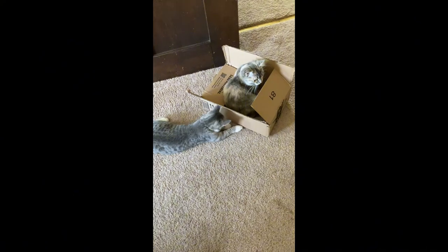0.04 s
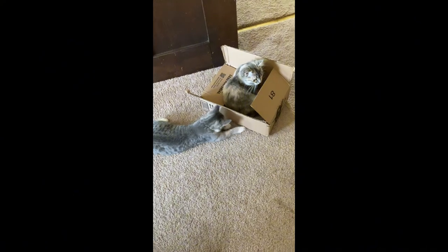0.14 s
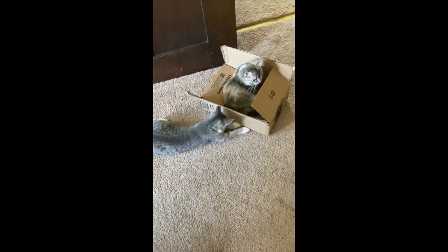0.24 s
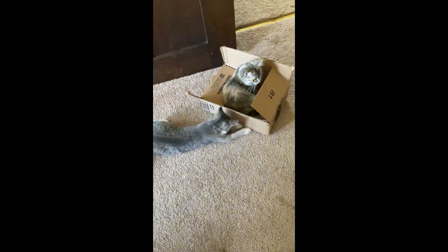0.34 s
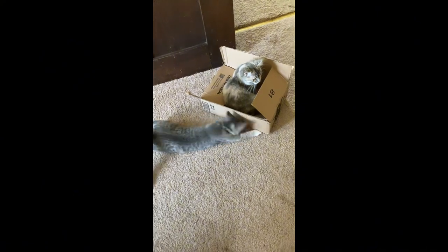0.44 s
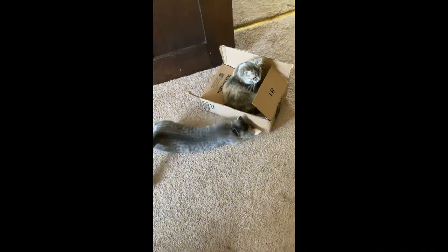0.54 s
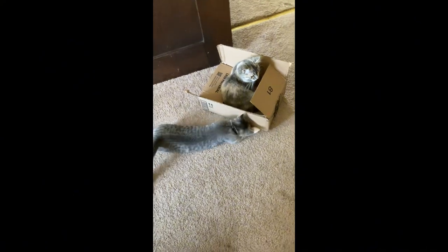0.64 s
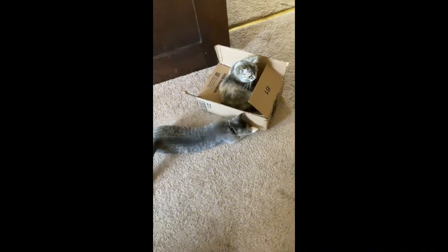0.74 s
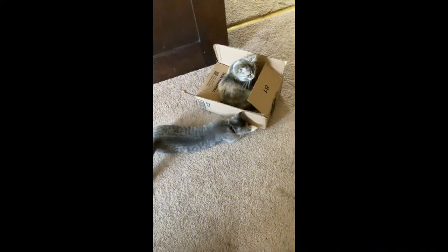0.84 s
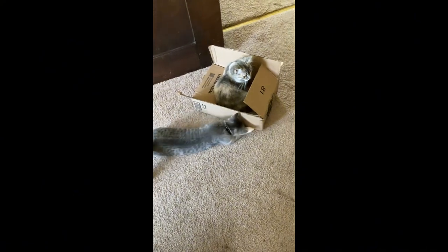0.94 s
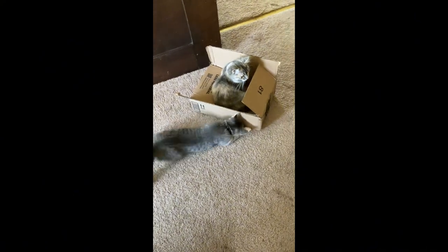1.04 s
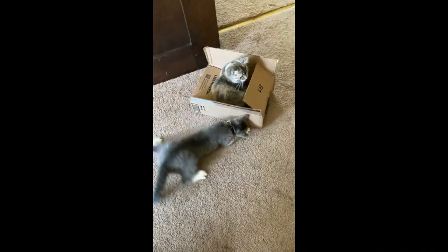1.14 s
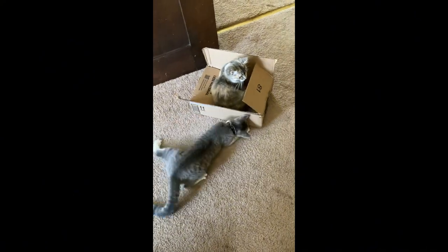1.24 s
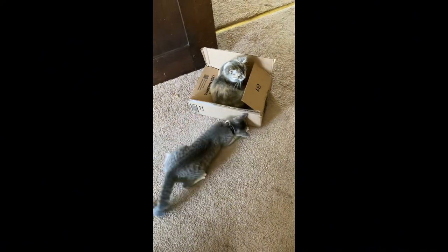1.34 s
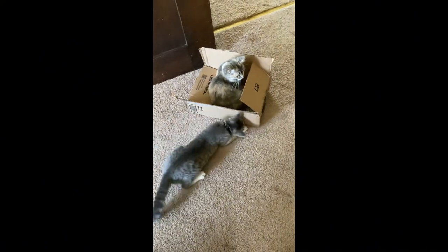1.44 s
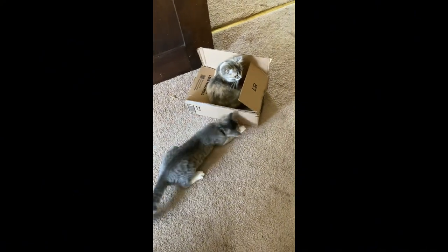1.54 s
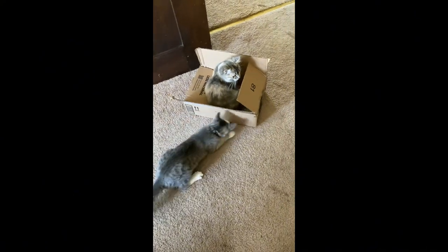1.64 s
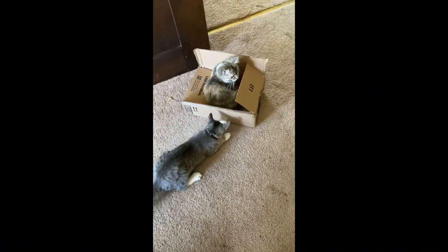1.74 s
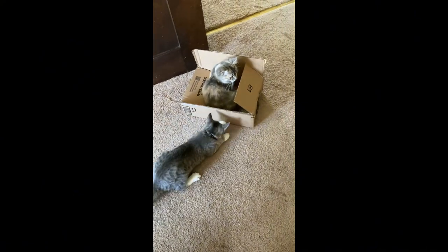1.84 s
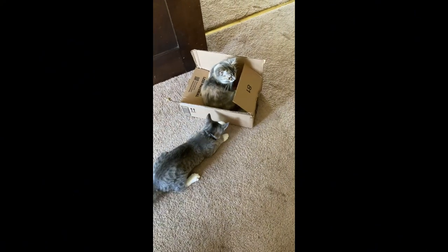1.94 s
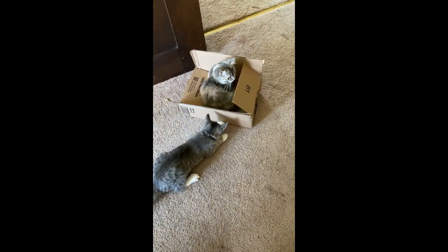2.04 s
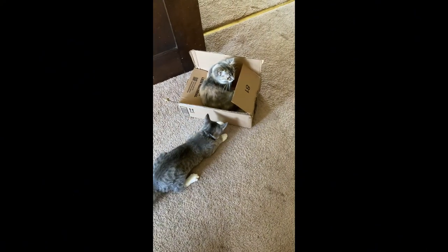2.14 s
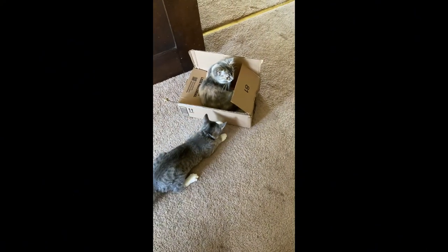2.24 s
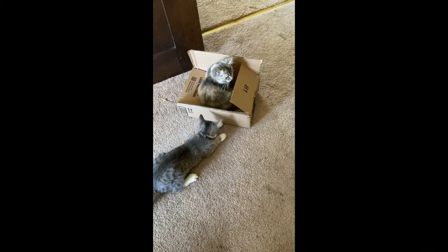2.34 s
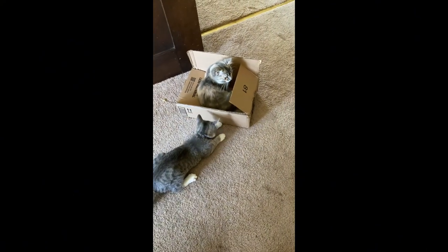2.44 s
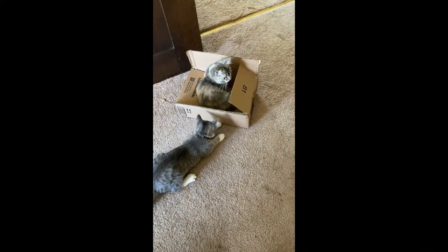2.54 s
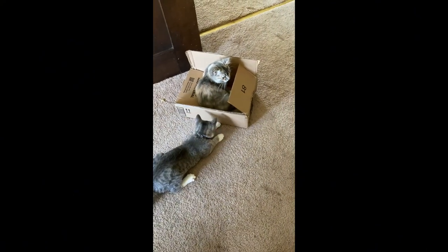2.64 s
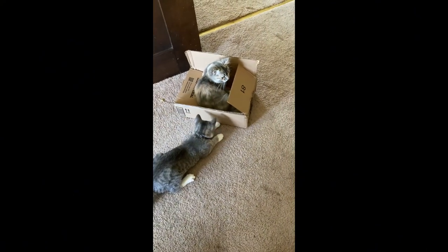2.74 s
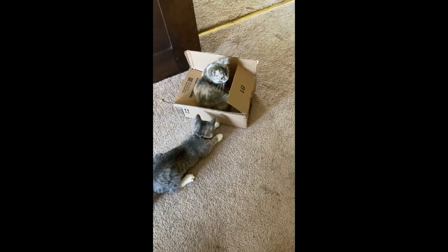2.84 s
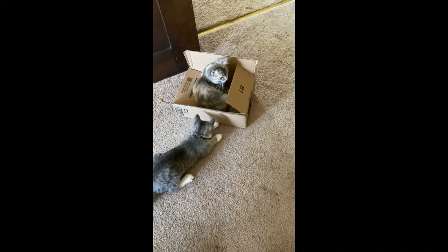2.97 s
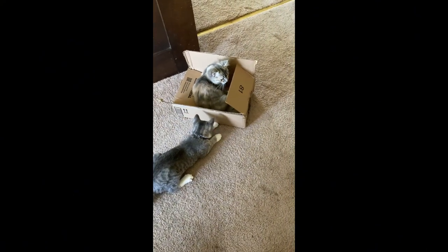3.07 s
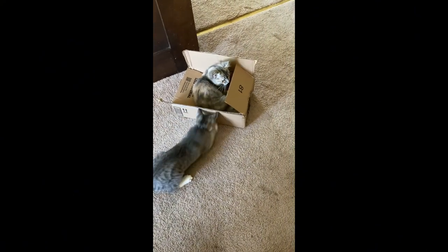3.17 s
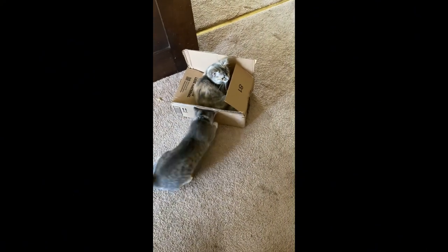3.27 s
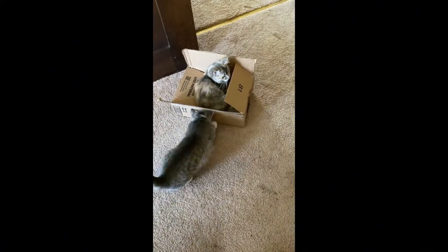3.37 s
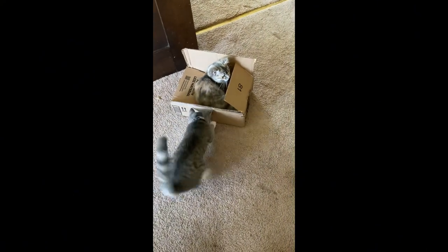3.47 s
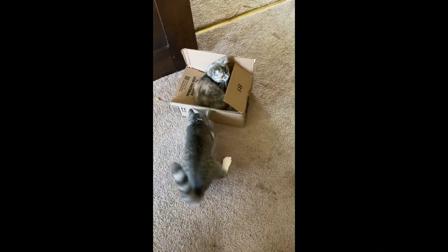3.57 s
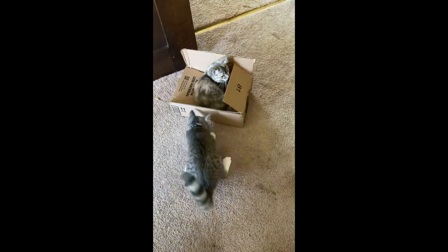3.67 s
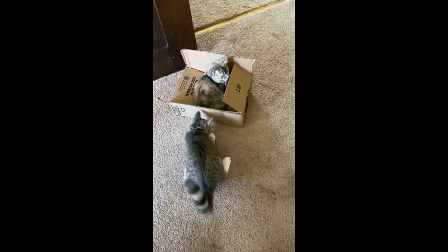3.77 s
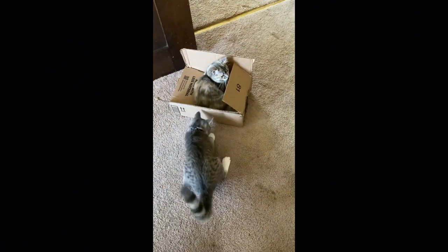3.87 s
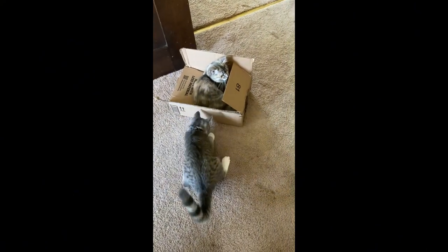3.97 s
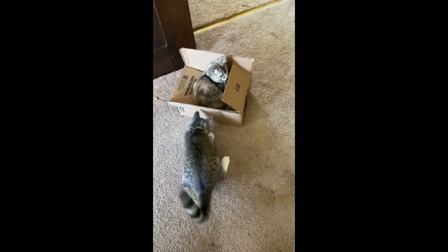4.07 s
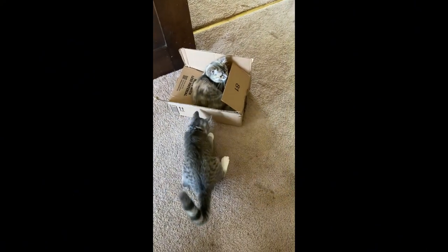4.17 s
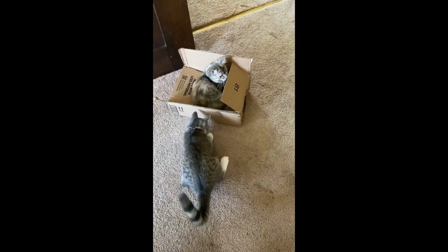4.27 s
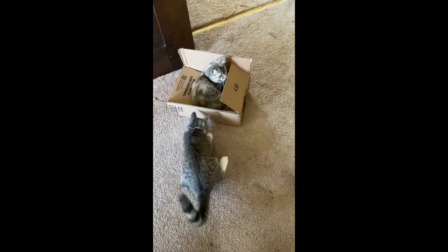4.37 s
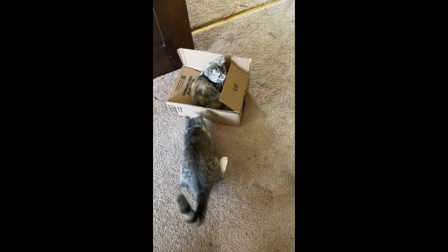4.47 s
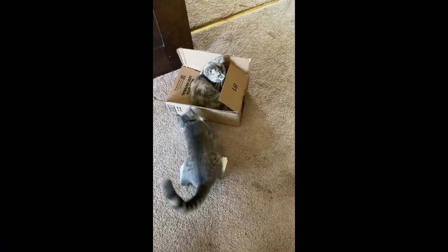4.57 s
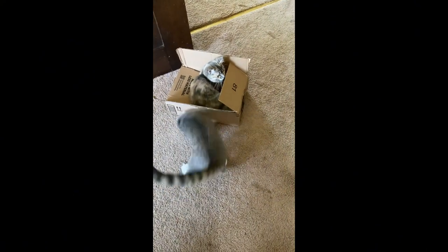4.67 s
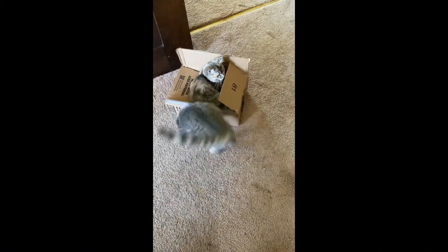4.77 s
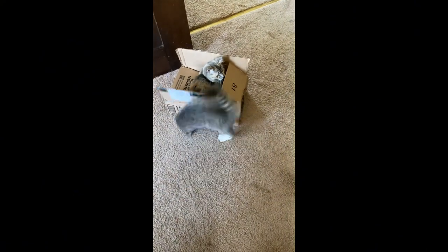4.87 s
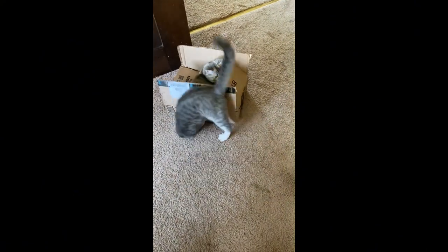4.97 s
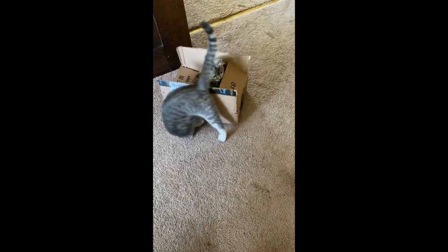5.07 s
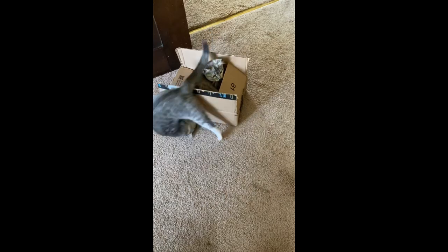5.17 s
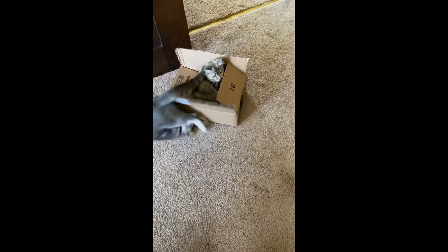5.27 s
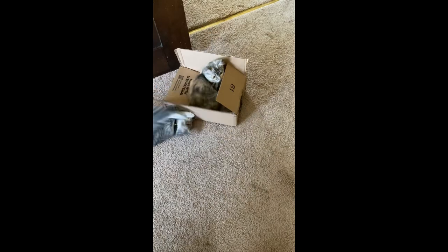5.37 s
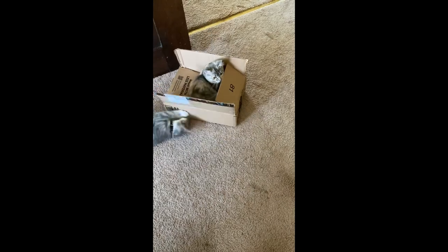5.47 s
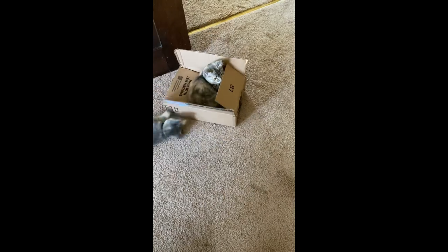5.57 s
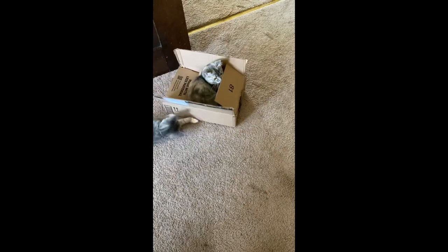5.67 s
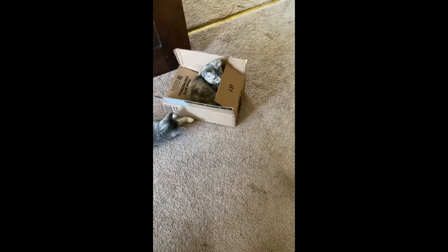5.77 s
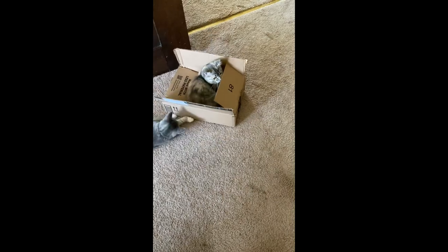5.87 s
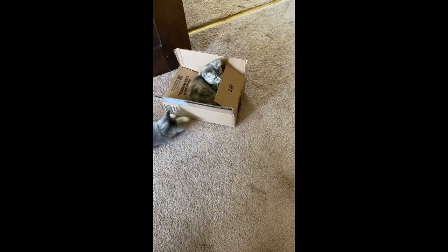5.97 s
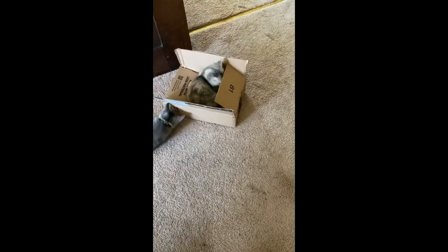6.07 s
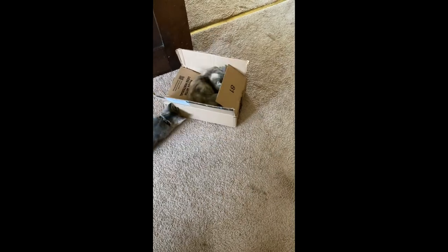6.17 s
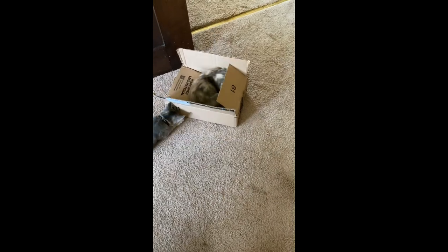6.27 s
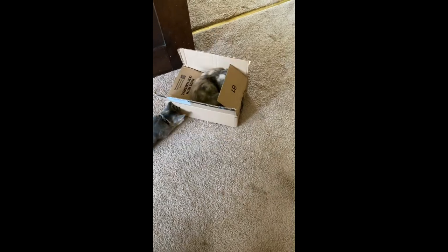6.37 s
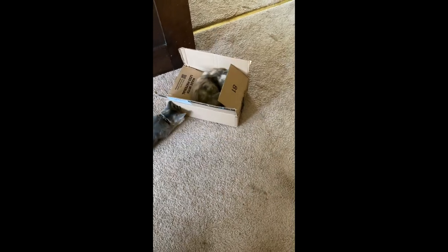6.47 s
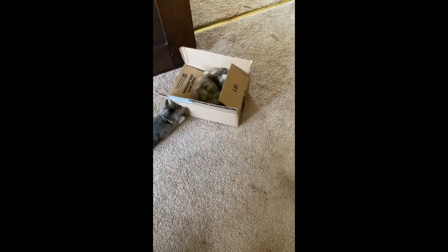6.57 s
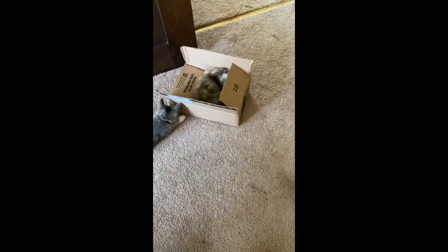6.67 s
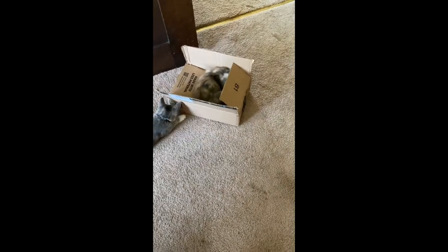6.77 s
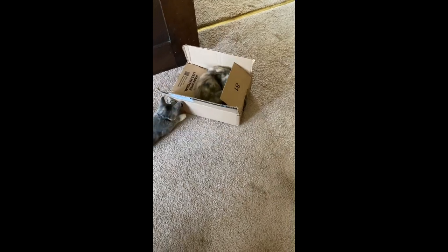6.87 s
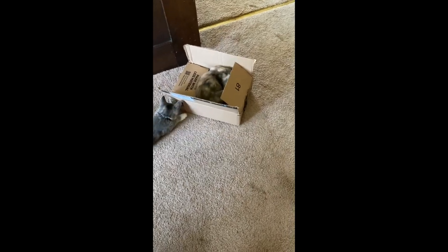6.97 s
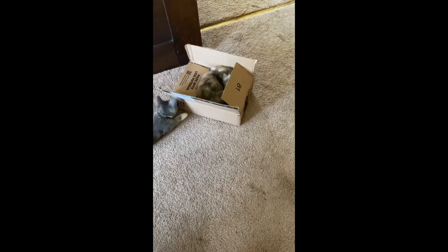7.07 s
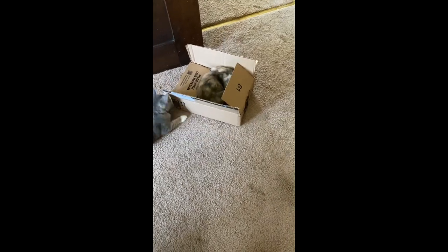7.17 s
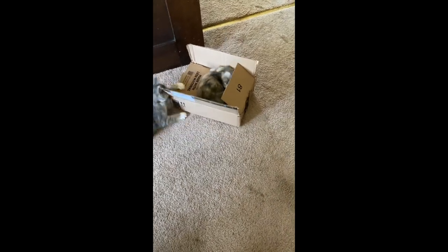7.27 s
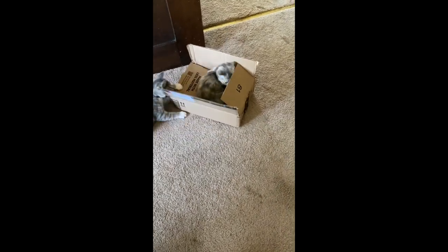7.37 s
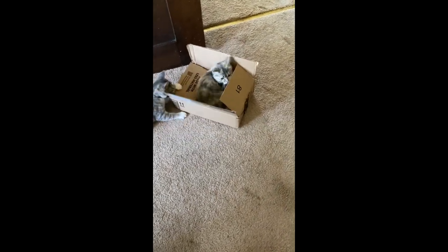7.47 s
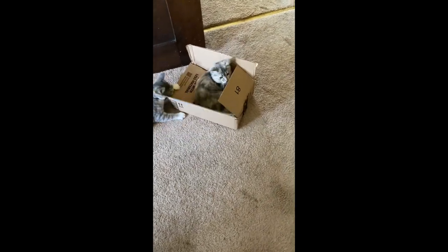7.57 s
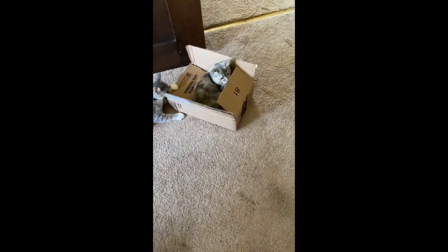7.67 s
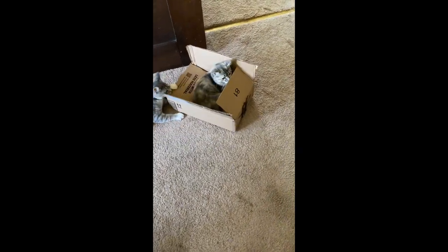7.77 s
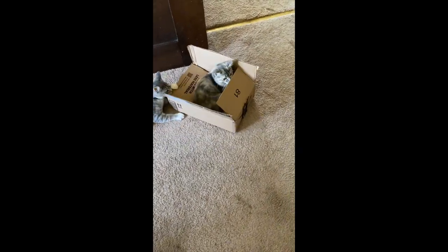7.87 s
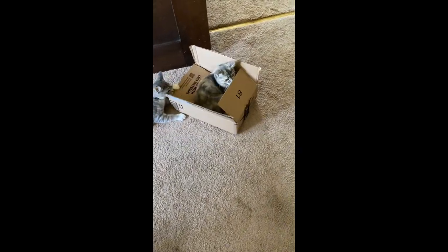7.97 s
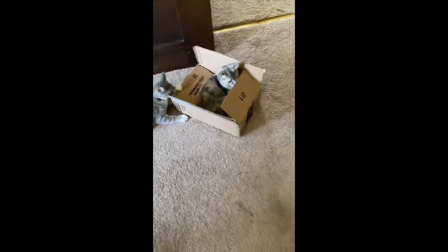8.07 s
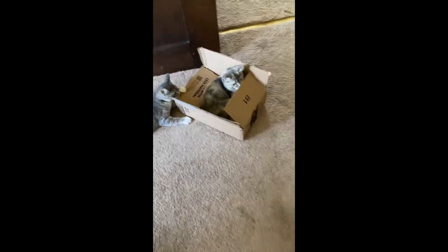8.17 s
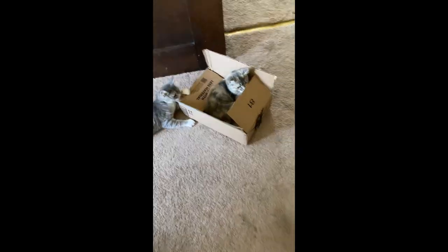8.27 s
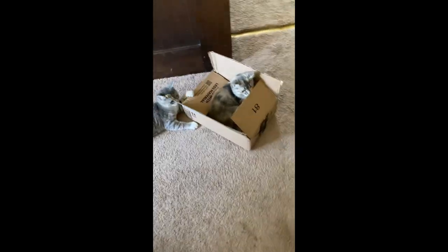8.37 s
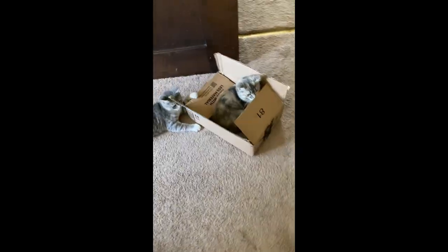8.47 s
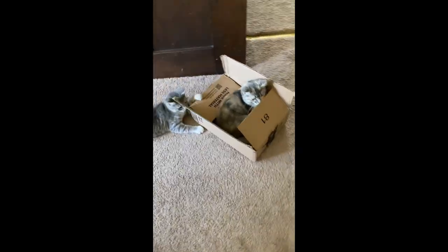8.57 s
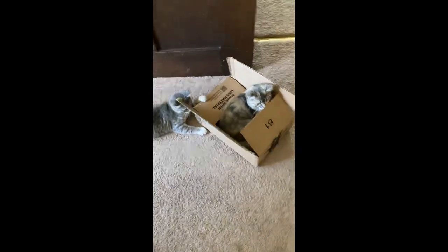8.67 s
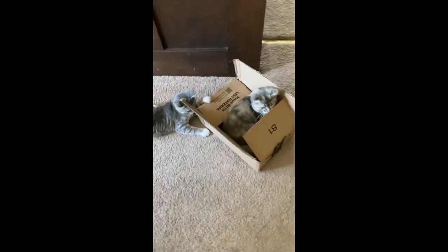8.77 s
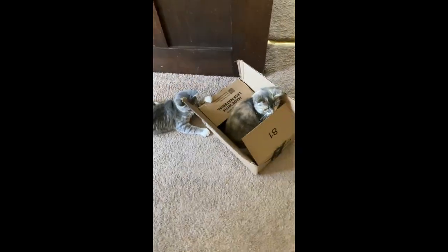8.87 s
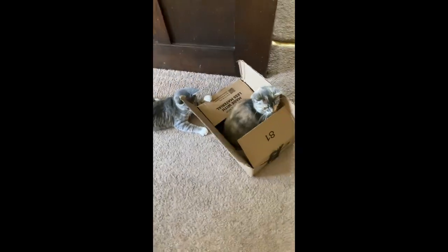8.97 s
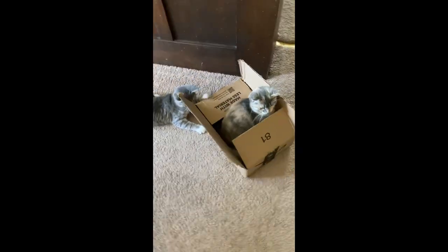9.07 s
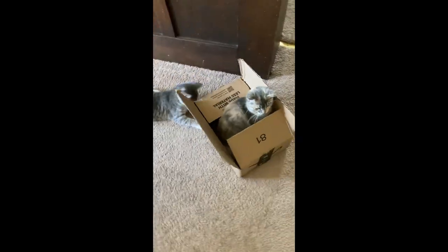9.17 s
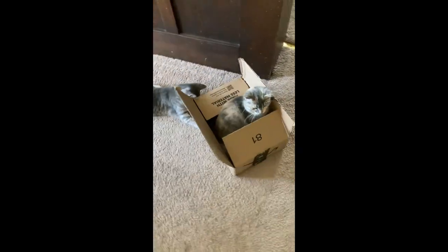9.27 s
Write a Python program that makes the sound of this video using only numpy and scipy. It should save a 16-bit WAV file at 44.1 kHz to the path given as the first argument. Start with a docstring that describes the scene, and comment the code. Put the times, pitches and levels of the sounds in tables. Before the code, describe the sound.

Close stereo pickup of a cardboard box being pawed on carpet: light claw ticks and a short slide, a pause, muffled bumps, then a dense flurry of sharp scratches and boxy thuds in the middle. Quiet follows, broken by a quick scrape and knock, faint brushing, and finally a soft drag with raspy rubbing. Low fan noise and a steady, distant ticking clock fill the small indoor room.

```python
"""Two kittens play in and around a cardboard box on a carpet, in a quiet room: their claws tap the cardboard
and excite its resonances, and paws thump the panels into damped low modes.
Claws scrape and fur swishes by stick-slip friction; the box slides on the carpet as a dense rush.
A pendulum clock ticks some way off as filtered impacts, mostly heard by way of the walls.
A fan hums as coloured noise with wavering tones; two close microphone ports listen."""
import sys
import numpy as np
from scipy import signal
from scipy.fft import rfft, irfft, next_fast_len
from scipy.io import wavfile
from scipy.ndimage import uniform_filter1d

SR = 44100
rng = np.random.default_rng(int(sys.argv[2]) if len(sys.argv) > 2 else 0)


def put_to_file(sound):
    """Save the sound as 16-bit audio at rate SR, in the file named by the first command-line argument."""
    columns = np.atleast_2d(sound).T  # one column per channel
    safe = np.clip(columns, -1, 1)
    whole_steps = np.round(safe * 32767)
    wavfile.write(sys.argv[1], SR, whole_steps.astype(np.int16))


N = 411012  # length in samples

# resonances of the cardboard: f/Hz, width/Hz, height over the broad colour/dB
CARDBOARD_MODES = [(670, 30, 1.5), (831, 85, 3), (1006, 68, -3), (1494, 140, 4.5), (1830, 32, 9),
                   (2000, 160, 5.5), (2340, 97, -4.5), (3150, 120, -2), (4160, 470, 7.5), (4415, 57, -2)]


def amp(db):
    """Level law: 20 dB is a factor of ten in amplitude."""
    return 10 ** (np.asarray(db) / 20)


def evened(x):
    """Normalisation to unit root-mean-square."""
    return x / np.sqrt(np.mean(x ** 2) + 1e-20)


def read(points, hz):
    """Linear interpolation of a table on a log-frequency axis."""
    f, value = np.transpose(points)
    return np.interp(np.log(hz + 1), np.log(f + 1), value)


def add(mix, s, sound):
    """Superposition: adds a sound to the mix from s seconds on."""
    part = mix[round(s * SR):][:len(sound)]
    part += sound[:len(part)]


def bins(size):
    """Discrete frequencies (Hz) of a real Fourier transform."""
    return np.fft.rfftfreq(size, 1 / SR)


def drift(hz):
    """Slow random fluctuation: low-passed noise of unit rms with its corner near hz."""
    t = np.arange(N // 64 + 2) * 64 / SR
    low_pass = 1 / (1 + (np.fft.rfftfreq(len(t), t[1]) / hz) ** 4)
    slow = irfft(rfft(rng.standard_normal(len(t))) * low_pass, len(t))
    return np.interp(np.arange(N) / SR, t, evened(slow))


def body(spectrum, modes=(), size=4096):
    """Minimum-phase resonator: a causal, unit-energy response of broad colour plus resonances."""
    hz = bins(size)
    db = read(spectrum, hz)
    for f, width, height in modes:
        db = db + height / (1 + (2 * (hz - f) / width) ** 2)
    log_gain = np.log(amp(np.r_[db, db[-2:0:-1]]))
    # the phase of a minimum-phase response is tied to its log gain by the Hilbert transform
    spectrum_with_phase = np.exp(np.conj(signal.hilbert(log_gain)))
    response = np.fft.ifft(spectrum_with_phase).real[:size // 2]
    return response / np.linalg.norm(response)


def ring(x, response):
    """Linear response: the excitation convolved with an impulse response."""
    return signal.oaconvolve(x, response)[:N]


def band_unit(x, lo, hi):
    """Band normalisation: scales x so that the band lo-hi (Hz) has unit rms."""
    band = signal.butter(4, [lo, hi], "band", fs=SR, output="sos")
    return x / np.std(signal.sosfilt(band, x))


def slips(per_s, spread_db, smooth):
    """Stick-slip friction of fibres: random clicks of uneven size over a share of smooth noise."""
    size = amp(spread_db * np.minimum(rng.exponential(1, N), 4)) * rng.choice([-1, 1], N)
    clicks = evened(size * (rng.random(N) < per_s / SR))
    return evened(clicks + smooth * rng.standard_normal(N))


def wander(x, patch_db, patch_hz, patch_s, size=512):
    """Time-varying response: smoothed random gains over time and frequency move its peaks and valleys."""
    z = signal.stft(x.astype(np.float32), SR, nperseg=size)[2]
    field = rng.standard_normal(z.shape, dtype=np.float32)
    for axis, span in enumerate((patch_hz * size / SR, patch_s * SR * 2 / size)):
        for _ in range(2):
            field = uniform_filter1d(field, max(round(span), 1), axis)
    patches = evened(amp(patch_db * np.clip(evened(field), -2, 2)))
    return signal.istft(z * patches, SR, nperseg=size)[1][:N]


def blow(db, t60, crack):
    """Impact excitation: one sharp contact and the clatter that builds and dies behind it."""
    t = np.arange(SR // 4) / SR
    force = rng.standard_normal(len(t)) * amp(-60 * t / t60) / 2
    force *= 1 - np.exp(-t / 0.0035)
    force[0] += crack
    return amp(db) * force


def stroke(rise, length):
    """Contact load and creep: pressure builds, sags and lets go; the cardboard settles behind it."""
    sag_db_per_s, release_db_per_s = 18.5, 422
    settle_db, settle_db_per_s = -15.5, 173  # the slow creep back
    t = np.arange(SR) / SR
    after = np.maximum(t - length, 0)
    load = np.sin(np.pi / 2 * np.minimum(t / rise, 1)) ** 2
    held = load * amp(-sag_db_per_s * np.minimum(t, length))
    return held * np.maximum(amp(-release_db_per_s * after), amp(settle_db - settle_db_per_s * after))


def per_port(pair, gains):
    """Transfer functions: left and right are each filtered by their own function of frequency."""
    size = next_fast_len(N, True)
    return irfft(rfft(pair, size) * gains(bins(size)), size)[:, :N]


def ports(a, b):
    """Stereo width by frequency: two unrelated sounds become a partly alike left and right."""
    # how alike left and right are in the reverberation and the fan rush: f/Hz, likeness (0 to 1)
    likeness = [(50, 0.71), (300, 0.89), (550, 0.27), (800, 0), (3600, 0), (5400, 0.91), (7000, 0.46),
                (11500, 0.96), (16000, 1)]
    same = np.clip(read(likeness, bins(len(a))), 0, 1)
    common = rfft(a) * np.sqrt((1 + same) / 2)
    apart = rfft(b) * np.sqrt((1 - same) / 2)
    return irfft([common + apart, common - apart], len(a))


def room(x, wet_db):
    """Reverberation: sparse reflections of random sign; each band decays at its own speed."""
    # decay of the room: f/Hz, T60/s
    decay = [(100, 0.68), (400, 0.27), (1000, 0.25), (3000, 0.11), (4500, 0.23), (8000, 0.07), (16000, 0.5)]
    # colour of the reverberation, to which wet_db is added: f/Hz, relative level/dB
    share = [(80, -11.5), (300, 2.5), (800, 8), (2000, -3.5), (4000, -0.5), (8000, -3), (16000, -12.5)]
    size = SR // 2
    taps = rng.choice([-1., 1.], (2, size)) * (rng.random((2, size)) < 4000 / SR)
    taps[:, :round(.003 * SR)] = 0  # the nearest wall is a step away
    hz, t, z = signal.stft(taps, SR, nperseg=256)
    fade = amp(-60 * t / read(decay, hz)[:, None])
    fade_rms = np.sqrt(np.mean(fade ** 2, axis=1, keepdims=True))
    fade *= amp(read(share, hz) + wet_db)[:, None] / fade_rms
    tails = signal.istft(z * fade, SR, nperseg=256)[1] / np.linalg.norm(taps[0])
    return np.array([ring(x, tail) for tail in ports(*tails)])


def fan():
    """Flow noise and tonal hum: a low rush of air with a few wavering tones, a little to the left."""
    # spectrum of the rush: f/Hz, relative spectral level/dB
    air = [(20, -8.5), (40, 1), (70, 4), (150, -4), (260, -3), (400, -2.5), (520, -10), (750, -19),
           (1100, -23), (2000, -27), (3500, -30.5), (6000, -32), (14000, -36.5)]
    # tones: f/Hz, rms level before wavering and panning/dB
    hum = [(75.4, -76), (237, -74.5), (571.5, -71.5), (1308, -93), (1717, -90)]
    t, colour = np.arange(N) / SR, body(air)
    rush = ports(ring(rng.standard_normal(N), colour), ring(rng.standard_normal(N), colour))
    rush = amp(-64.5) * rush * amp(0.5 * drift(0.77))
    tones = np.zeros(N)
    for hz, db in hum:
        level = amp(db) * np.sqrt(2) * (1 + 0.39 * drift(13))
        tones += level * np.sin(2 * np.pi * hz * t + 1.2 * drift(4.9))
    return (rush + tones) * amp([[.5], [-.5]])


def clock():
    """Impact-excited case: the escapement rattles it twice a swing, mostly heard by way of the walls."""
    # spectrum of a beat: f/Hz, relative spectral level/dB
    colour = [(300, -42), (800, -18), (1300, -8), (2300, -6), (3000, -17), (4200, -20), (5400, -25),
              (7000, -27), (16000, -25)]
    # resonances of the case: f/Hz, width/Hz, height/dB
    case_modes = [(1330, 140, 5), (1700, 590, 10), (2260, 120, 9), (3920, 300, 12), (4530, 260, 11),
                  (9300, 900, 10)]
    first_tick_s, swing_s, tock_after_s = 0.181, 1.0433, 0.551
    tick_db, tock_db = -41.5, -47  # strength of the blows, ahead of case and room
    beats = np.zeros(N)
    for swing in np.arange(first_tick_s, N / SR, swing_s):
        for s, db in (swing, tick_db), (swing + tock_after_s, tock_db):
            add(beats, s, blow(db, t60=0.066, crack=3.3))
    case = wander(ring(beats, body(colour, case_modes)), patch_db=4, patch_hz=400, patch_s=0.32)
    return amp(-6.0) * (case + room(case, wet_db=8.0))


def dragging():
    """Sliding friction: the bottom of the box rides over the carpet pile as a dense, broad rush."""
    # drags of the whole box: start t/s, rise t/s, length t/s, level/dB
    drags = [(0.062, 0.042, 0.28, -59), (0.362, .04, 0.23, -64.5), (0.989, 0.05, 0.14, -48.5),
             (8.124, .03, 0.27, -64), (8.377, 0.0093, 0.22, -62.5), (8.974, 0.039, 0.71, -60)]
    # spectrum of the rush: f/Hz, relative spectral level/dB
    colour = [(30, -8), (80, -3), (160, -7), (260, -6.5), (400, 4), (550, 0), (750, -5.5), (1100, -10.5),
              (1700, -9), (2500, -11), (4000, -13.5), (5600, -19), (8500, -21), (14500, -16.5)]
    weight = np.zeros(N)
    for s, rise, length, db in drags:
        add(weight, s, amp(db) * stroke(rise, length))
    rush = ring(slips(per_s=1500, spread_db=4, smooth=0.77), body(colour))
    return weight * evened(wander(rush, patch_db=5.5, patch_hz=350, patch_s=.03))


def pressures():
    """Power addition: strokes and brushes sum into gains for dull and bright scrape, swish and rumble."""
    # a paw or flank slides over the cardboard, bright on a cut edge, dull on a flat panel: start t/s,
    # rise t/s, length t/s, claw scrape level/dB, bright over dull scrape/dB, fur swish level/dB,
    # panel rumble level/dB
    strokes = [(0.097, 0.0066, 0.018, -56.5, 6, -57.5, -71), (0.197, 0.0056, .035, -53.5, -2, -59.5, -64),
               (0.31, 0.0043, 0.026, -58, 3, -60, -56), (0.371, 0.0055, 0.023, -69, -4, -63.5, -61.5),
               (0.985, 0.027, 0.14, -63.5, 2, -59, -72), (3.084, 0.003, 0.021, -60.5, 1, -71, -55),
               (3.148, 0.015, 0.077, -66, -11, -69.5, -44.5), (3.25, 0.0076, 0.11, -68, -5, -77, -49),
               (3.49, 0.017, 0.053, -63.5, -7, -76, -44), (4.515, 0.0019, 0.0084, -42.5, -7, -55.5, -47),
               (4.8, 0.058, .19, -52, -2, -56.5, -38.5), (4.984, 0.062, .12, -50.5, 0, -54.5, -51),
               (5.119, 0.0069, 0.15, -45, 0, -59, -50.5), (5.322, 0.092, 0.13, -40, 8, -50.5, -50),
               (5.599, 0.0059, 0.092, -41.5, -2.5, -56, -48), (5.906, 0.03, 0.046, -43, -3.5, -54.5, -48.5),
               (5.967, 0.0067, 0.054, -58.5, -6, -76, -44.5), (6.035, .006, 0.0089, -58, -11, -68.5, -52),
               (7.19, 0.0017, 0.02, -48, 6, -59.5, -60), (7.228, 0.026, 0.063, -43, -5, -57.5, -57),
               (7.496, 0.087, 0.073, -61, 2, -66.5, -49.5), (7.622, 0.046, 0.066, -65, 13, -63, -69),
               (8.163, 0.0084, 0.13, -89, 7, -75, -62.5), (8.505, 0.016, 0.12, -73, 8, -73.5, -57),
               (8.798, 0.064, 0.051, -60, -21.5, -56.5, -61), (9.004, 0.11, 0.14, -56, -2, -57.5, -62),
               (9.104, 0.053, 0.062, -50, 7, -49, -50.5), (9.188, 0.052, 0.05, -47, -3.5, -53.5, -51.5)]
    # a body brushes softly over the carpet and the box: start t/s, length t/s, swish level/dB
    brushes = [(0, .06, -72.5), (0.297, 0.52, -79.5), (0.78, .12, -89), (0.923, 0.19, -73.5),
               (1.32, 0.17, -80.5), (3.343, 0.38, -76), (4.193, 0.12, -87.5), (4.405, 0.24, -90),
               (4.55, 0.22, -77.5), (6.2, 0.27, -86.5), (6.688, 0.28, -82), (7.05, 0.16, -80.5),
               (7.296, 0.46, -75), (7.98, 0.91, -78.5), (8.852, 0.19, -72)]
    brush_scrape_db, brush_rumble_db = 0, 11.5  # against the swish
    power = np.zeros((4, N))
    for s, rise, length, scrape, bright, swish, rumble in strokes:
        shape = stroke(rise, length)
        levels = (scrape - bright / 2, scrape + bright / 2, swish, rumble)
        for layer, db in zip(power, levels):
            add(layer, s, (amp(db) * shape) ** 2)
    for s, length, swish in brushes:
        arch = np.sin(np.linspace(0, np.pi, round(length * SR)))
        for layer, db in zip(power, (brush_scrape_db, brush_scrape_db, 0, brush_rumble_db)):
            add(layer, s, (amp(swish + db) * arch) ** 2)
    return np.sqrt(power)


def rubbing():
    """Stick-slip excitation: claws rasp over the cardboard, fur and carpet swish, the panels rumble."""
    # spectra of scrape, swish and rumble: f/Hz, relative spectral level/dB
    scrape_colour = [(100, -1), (300, -6.5), (500, 3.5), (700, -5), (1100, 2.5), (2000, 0), (2900, 3),
                     (3800, -10.5), (5400, -4.5), (8000, -52), (16000, -36)]
    swish_colour = [(500, -55), (2000, -2), (4000, -10.5), (5500, -0.5), (7500, 0.5), (10500, 5.5),
                    (13000, 5.5), (15500, 2)]
    rumble_colour = [(25, -36.5), (60, -2.5), (120, -6.5), (220, 0.5), (340, -2.5), (480, -15.5),
                     (700, -24.5), (1500, -43.5)]
    bright_above_hz = 2100
    dull_gain, bright_gain, swish_gain, rumble_gain = pressures()
    grip = evened(amp(1.46 * drift(34)))  # the contact grips and lets go
    scrape = ring(grip * slips(per_s=450, spread_db=2.0, smooth=1.0), body(scrape_colour, CARDBOARD_MODES))
    swish = ring(grip * slips(per_s=1600, spread_db=2, smooth=0.87), body(swish_colour))
    rumble = ring(slips(per_s=500, spread_db=6, smooth=0.62), body(rumble_colour))
    scrape = band_unit(wander(scrape, patch_db=5.5, patch_hz=305.4, patch_s=.025), 590, 7000)
    swish = band_unit(wander(swish, patch_db=2.5, patch_hz=450, patch_s=.025), 8500, 10020)
    rumble = band_unit(rumble, 120, 500)
    low_pass = signal.butter(3, bright_above_hz, fs=SR, output="sos")
    dull = signal.sosfiltfilt(low_pass, scrape)
    bright = scrape - dull
    return dull_gain * dull + bright_gain * bright + swish_gain * swish + rumble_gain * rumble


def thumps():
    """Damped panel modes: a soft push swells the lowest, which sags in pitch; a fainter, higher one sounds too."""
    # paws and bodies land on box and floor: t/s, level before the trim/dB,
    # nominal f/Hz (the pitch glides from above it to below it), T60/s
    landings = [(1.553, -44.5, 206, 0.11), (2.31, -47.5, 123, 0.24), (2.346, -43.5, 116, 0.11),
                (3.165, -23.5, 244, 0.048), (3.212, -38, 223, 0.19), (3.276, -36, 304, 0.037),
                (3.352, -35.5, 192, 0.3), (3.384, -32, 105, 0.196), (3.501, -36, 299.3, .2),
                (3.542, -32, 112, 0.069), (3.594, -39.5, 135.2, 0.29), (3.642, -40.5, 209.4, 0.14),
                (4.522, -31, 284, 0.083), (4.618, -43, 294, .12), (4.843, -26, 226, .088),
                (4.897, -23, 183.5, 0.09), (4.903, -20.5, 294, 0.036), (5.322, -30.5, 167, 0.055),
                (5.433, -37, 334, 0.13), (5.541, -19.5, 144, 0.057), (5.554, -33, 60, .25),
                (5.608, -31, 230, 0.054), (5.956, -24.5, 227.5, 0.066), (6.003, -34.5, 292, 0.067),
                (7.203, -27.5, 284.6, 0.086), (7.234, -34.5, 219.3, 0.22), (7.291, -37, 226, 0.065),
                (7.515, -37.5, 209, 0.17), (8.178, -42.5, 317, 0.03), (8.563, -46.5, 410, 0.061),
                (9.176, -33, 87, 0.11), (9.207, -46.5, 218, 0.87)]
    push_s, trim_db = 0.008, -3.5  # a soft paw takes push_s to load the panel
    out, t = np.zeros(N), np.arange(SR // 3) / SR
    for s, db, hz, t60 in landings:
        load = np.sin(np.pi / 2 * np.minimum(t / push_s, 1)) ** 2
        swell = load * amp(-60 * np.maximum(t - push_s, 0) / t60)
        turns = np.cumsum(hz * (.92 + 0.14 * np.exp(-t / 0.027))) / SR
        modes = np.sin(2 * np.pi * turns) + 0.2 * np.sin(2 * np.pi * 1.55 * turns)
        add(out, s, amp(db + trim_db) * swell * modes)
    return out


def claws():
    """Impact excitation of a resonator: dull knocks and bright snaps ring the same cardboard."""
    # a claw knocks and flicks free: t/s, dull knock level/dB, bright snap level/dB (both before
    # the trim), clatter T60 of the knock/s
    taps = [(0.065, -41, -55, .037), (0.101, -50, -42, 0.031), (0.2, -48, -22, 0.026),
            (0.467, -42.5, -64, .069), (0.548, -64, -47, .02), (0.726, -39, -53, .13),
            (1.168, -40.5, -33.5, 0.023), (1.342, -65, -44, 0.018), (1.547, -47, -30, 0.13),
            (3.143, -29, -26, 0.087), (3.278, -36.5, -37, 0.049), (3.29, -38, -25.5, 0.036),
            (3.35, -42, -66, 0.12), (3.499, -28, -29.5, 0.044), (4.521, -21, -38, 0.025),
            (4.619, -32.5, -55, 0.043), (4.673, -49, -34.5, 0.016), (4.825, -48, -28.5, 0.022),
            (4.91, -29.5, -13.5, 0.048), (4.961, -28.5, -13.5, 0.1), (5.03, -54, -29, .02),
            (5.065, -36, -42.5, 0.037), (5.127, -36, -30, 0.026), (5.141, -37, -11, .03),
            (5.261, -33, -13.5, 0.016), (5.345, -43, -29.5, 0.022), (5.435, -24, -47, .02),
            (5.537, -29.5, -42, 0.0093), (5.604, -34, -20, 0.047), (6.01, -57, -29, 0.022),
            (7.194, -31, -35, 0.024), (7.25, -35, -40, .067), (8.172, -46, -32.5, 0.024),
            (8.26, -63, -49, 0.022), (8.389, -44, -64, 0.1), (8.565, -38.5, -55, 0.038),
            (8.823, -47, -31.5, 0.085), (9.045, -41, -30, 0.038), (9.124, -52, -43, 0.011)]
    # spectra of knock and snap: f/Hz, relative spectral level/dB
    knock_colour = [(25, -45), (110, -0.5), (300, 11), (700, -4), (1100, 2), (2000, -10), (2900, -8.5),
                    (4000, -22.5), (7000, -20), (16000, -30)]
    snap_colour = [(200, -26), (1000, 13.5), (2500, 14.5), (4000, 4.5), (7000, 7.5), (11000, 15),
                   (16000, 10)]
    snap_t60_s, trim_db = 0.015, -1.5
    knocks, snaps = np.zeros(N), np.zeros(N)
    push = signal.windows.hann(15)
    for s, knock_db, snap_db, t60 in taps:
        add(knocks, s, blow(knock_db, t60, crack=3.4))
        add(knocks, s, amp(knock_db - 12.5) * push)  # the paw behind the claw gives the knock its body
        add(snaps, s, blow(snap_db, snap_t60_s, crack=0.96))
    knocked = ring(knocks, body(knock_colour, CARDBOARD_MODES))
    snapped = ring(snaps, body(snap_colour, CARDBOARD_MODES))
    return amp(trim_db) * (knocked + snapped)


def scene():
    """Superposition of sources: the box a little to the right and its room, the clock and the fan."""
    # level difference of the box between the ports: f/Hz, left minus right/dB
    balance = [(100, 0.5), (400, 1), (800, -1.5), (1300, -2), (1800, -2), (2450, -5.5), (3200, -0.5),
               (4000, -0.5), (8000, 0.9)]
    box = rubbing() + dragging() + thumps() + claws()
    heard = per_port(box + room(box, wet_db=-3.0),
                     lambda hz: amp(np.outer([.5, -.5], read(balance, hz))))
    return heard + clock() + fan()


def record(dry):
    """Phase difference between receivers: the two ports hear out of step; then the band limit."""
    # phase between the ports: f/Hz, lead of the left/rad
    lead = [(20, 0), (350, -.15), (700, -.9), (1100, -.6), (1800, .3), (2700, 1.9), (3800, .9),
            (5100, 2.95), (6000, 3.35), (7600, 6.2), (9500, 6.4), (11100, 9.3), (12400, 9.5), (14200, 12.5)]
    edge_hz = 15900
    pair = per_port(dry, lambda hz: np.exp(1j * np.outer([.5, -.5], read(lead, hz))))
    low_pass = signal.firwin(255, edge_hz, window=("kaiser", 9), fs=SR)
    return signal.oaconvolve(pair, low_pass[None], "same")


dry = scene()
out = record(dry)
put_to_file(out)
```